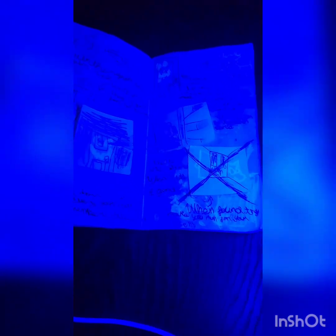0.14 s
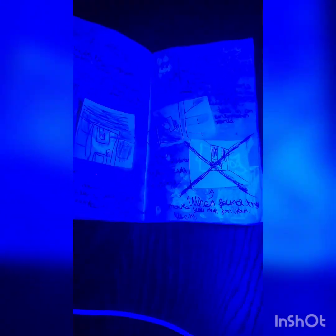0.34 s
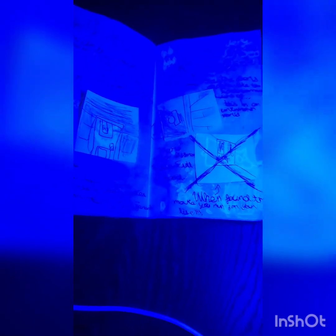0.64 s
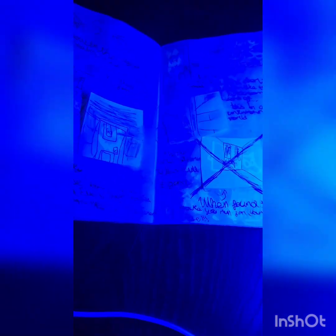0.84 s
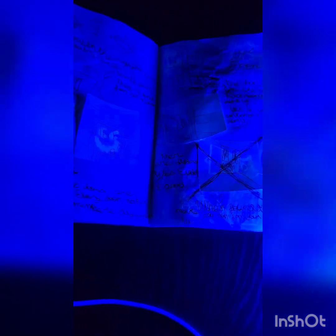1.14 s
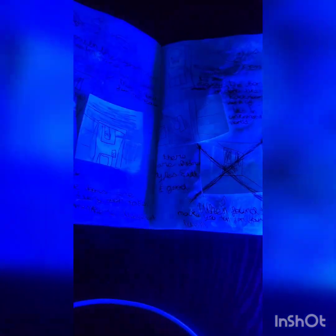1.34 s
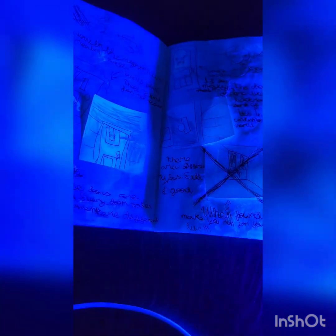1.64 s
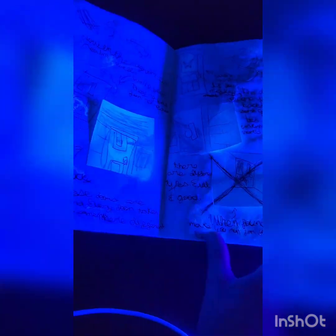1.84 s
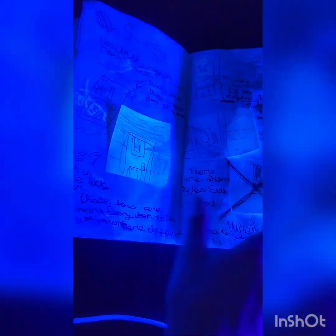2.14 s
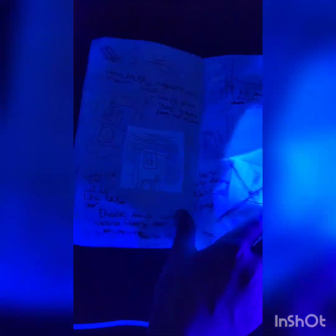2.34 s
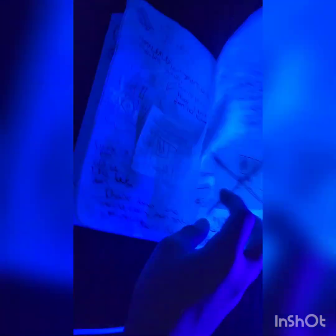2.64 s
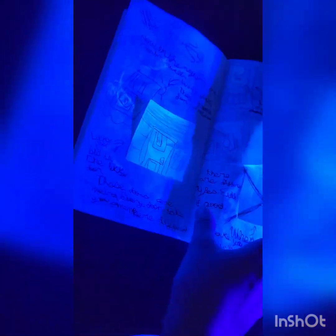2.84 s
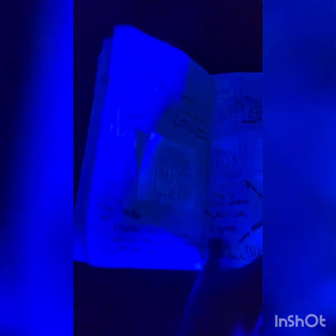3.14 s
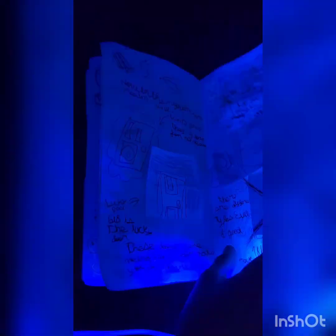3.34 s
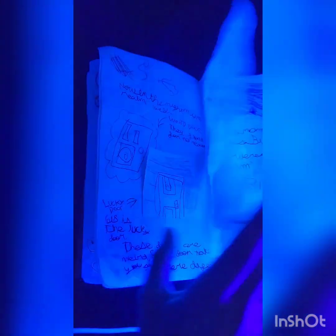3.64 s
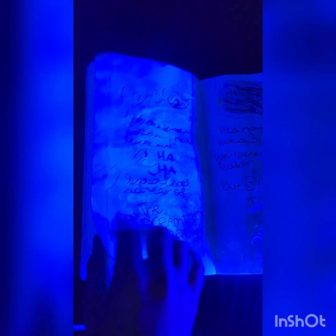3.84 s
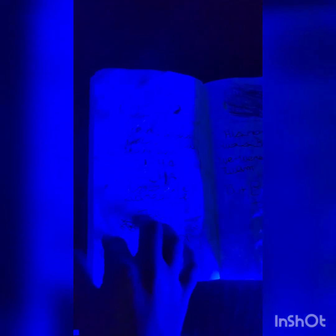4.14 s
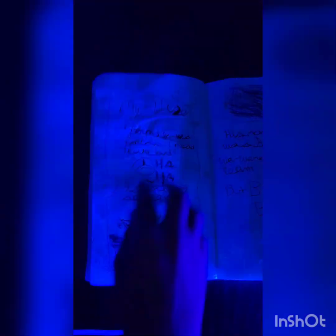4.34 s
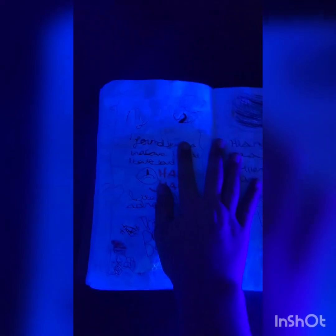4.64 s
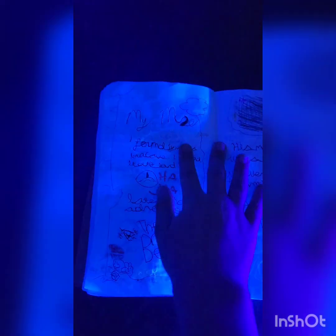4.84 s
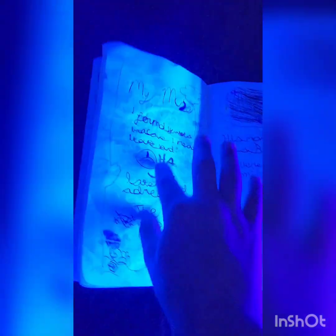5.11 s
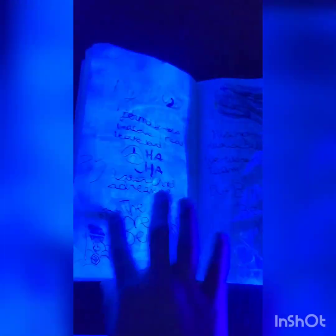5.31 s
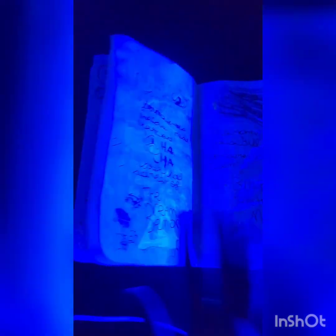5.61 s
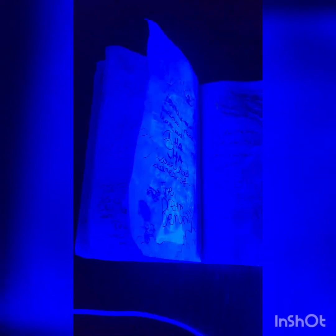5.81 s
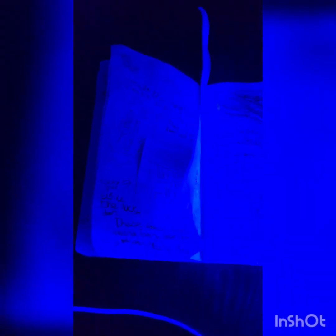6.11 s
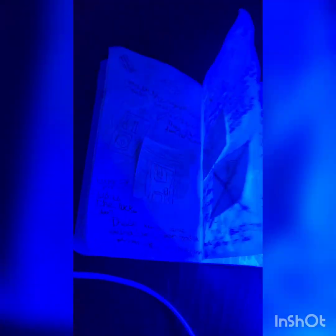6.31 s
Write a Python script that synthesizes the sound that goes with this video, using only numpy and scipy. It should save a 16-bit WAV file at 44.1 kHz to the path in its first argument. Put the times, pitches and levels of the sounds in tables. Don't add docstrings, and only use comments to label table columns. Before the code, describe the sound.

In a quiet indoor room, very close to a stereo phone microphone, a small hard object is knocked down sharply, then rattles loosely. Stiff, thick book pages are lifted and turned with hissing slides, crackling creases and a low thump on the table, ending the turn with a bright, sharp snap. Softer smoothing strokes, small snaps and dull finger pats follow over faint hiss and low building drone.

```python
import sys
import numpy as np
from scipy import signal
from scipy.io import wavfile
from scipy.ndimage import uniform_filter1d

SR = 44100
rng = np.random.default_rng(int(sys.argv[2]) if len(sys.argv) > 2 else 0)


def voltage_ratio(level):
    return 10 ** (np.asarray(level, float) / 20)


def generate_wav(signal):
    frames = np.transpose(np.atleast_2d(signal))
    scaled = np.clip(frames, -1, 1) * 32767
    pcm = np.round(scaled).astype(np.int16)
    wavfile.write(sys.argv[1], SR, pcm)


N = 285327

# pitch_hz [Hz], level_db [dB per Hz]
SLIDE_COLOUR = [(400, -19), (1000, 2.5), (1800, 0.5), (2600, 3), (3500, 3.5), (5400, 3), (7500, 3.5),
                (11000, -1.5), (16000, 6.5)]


def slide():
    dull_level, sharp_level, body_level = strokes()
    quick_clumps = evened(uniform_filter1d(rng.standard_normal(N), size=400))
    slow_clumps = evened(uniform_filter1d(rng.standard_normal(N), size=1600))
    clumps = voltage_ratio(1.0 * quick_clumps + 0.67 * slow_clumps)

    happens = rng.random(N) < 1500 / SR
    tick_size = voltage_ratio(2.8 * np.minimum(rng.exponential(1, N), 5))
    ticks = happens * tick_size * rng.choice([-1, 1], N)
    shared = rng.standard_normal((3, 1, N))
    ports = rng.standard_normal((3, 2, N))
    fine, coarse, page = clumps * (0.46 * evened(ticks) + 0.22 * shared + 2.2 * ports)

    sharp = coloured(coloured(fine, SLIDE_COLOUR), [(2500, -20), (4300, -3), (6000, 0)])
    dull = coloured(coloured(coarse, SLIDE_COLOUR), [(3000, 0), (4300, -3), (7500, -20)])
    hiss = (dull * dull_level + sharp * sharp_level) / (dull + sharp).std()
    body = evened(band(band(page, 610, 1430), 610, 1430))
    rubbing = patchy(hiss + body_level * body)
    return sides(0.49)[:, None] * (rubbing + dull_level * crackle())


# start_s [s], length_s [s],
# rise_share [part of the length], peak_db [dB], bright_db [dB]
PAPER_STROKES = [(0.99, 0.16, 0.86, -67, 6.5), (1.39, 0.23, 0.23, -63.5, -2), (1.919, 0.18, 0.051, -57.5, 0),
                 (1.978, 0.15, 0.73, -55.5, -2.5), (2.118, 0.16, 0.22, -59, -2.5),
                 (2.302, 0.05, 0.043, -46, -1), (2.356, 0.086, 0.06, -48.5, -1.5),
                 (2.391, 0.36, 0.18, -36.5, -0.5), (2.575, 0.14, 0.65, -38.5, -2),
                 (2.687, 0.24, 0.64, -42.5, -1), (2.885, 0.19, 0.31, -55.5, -1.5),
                 (3.041, 0.034, 0.61, -48.5, -5), (3.072, 0.53, 0.31, -39, -1.3),
                 (3.348, 0.11, 0.94, -44, -4.5), (3.433, 0.15, 0.93, -49.5, -2.5),
                 (3.609, 0.14, 0.24, -60, -1.5), (3.792, 0.05, 0.92, -56.5, -9),
                 (3.834, 0.037, 0.54, -31, -0.5), (3.842, 0.19, 0.065, -46.5, -2),
                 (3.943, 0.25, 0.36, -58.5, 2),
                 (4.185, 0.16, 0.53, -49, 2), (4.33, 0.068, 0.43, -51, -1.5), (4.4, 0.1, 0.41, -46.5, 0),
                  (4.494, 0.096, 0.25, -41, 0), (4.55, 0.22, 0.42, -49, -1),
                  (4.629, 0.074, 0.66, -46.5, -2), (4.76, 1, 0.17, -59.5, -2.5),
                  (5.03, 0.19, 0.87, -50.5, -0.5), (5.2, 0.29, 0.17, -56, 7.5),
                  (5.418, 0.14, 0.17, -54.5, 4), (5.481, 1, 0.15, -65.5, -2), (5.68, 0.5, 0.5, -68.5, 3),
                  (6.03, 0.13, 0.86, -56, -2.5), (6.17, 0.065, 0.48, -55.5, -9.5),
                  (6.231, 0.054, 0.38, -61, -10), (6.26, 0.62, 0.14, -59.5, -4.5)]


def strokes():
    edge_db, edge_power = -13.5, 1.31
    t, power = np.arange(N) / SR, np.zeros((3, N))
    for start, length, share, db, bright_db in PAPER_STROKES:
        now = slice(round(start * SR), round((start + length) * SR))
        peak = start + np.clip(share, .02, .98) * length
        swell = np.interp(t[now], [start, peak, start + length], [0, 1, 0])
        body_db = -13 - 0.2769 * (db + 55.5) - 1.64 * bright_db
        part_db = np.array([[-bright_db], [bright_db], [body_db]])
        level = voltage_ratio(db + edge_db * (1 - swell) ** edge_power + part_db)
        power[:, now] += level ** 2 * np.minimum(swell / 0.3, 1)
    return np.sqrt(power)


def patchy(x):
    z = signal.stft(x, nperseg=256, noverlap=192)[2]
    field = rng.standard_normal(z.shape[1:])
    for axis, size in ((0, 4), (1, 14)):
        field = uniform_filter1d(field, size=size, axis=axis)
        field = uniform_filter1d(field, size=size, axis=axis)
    patches = voltage_ratio(1.37 * evened(field))
    return signal.istft(z * patches, nperseg=256, noverlap=192)[1][:, :N]


def crackle():
    per_s, level_db = 350, -19.5
    out, t = np.zeros(N), np.arange(300) / SR
    size = (rng.random(N) < per_s / SR) * voltage_ratio(4.0 * np.minimum(rng.exponential(1, N), 3))
    pitches = np.geomspace(750, 7500, num=12)
    which = rng.integers(0, len(pitches), N)
    for k, hz in enumerate(pitches):
        fade = voltage_ratio(-60 * t * hz / 9.4) * (1 - np.exp(-t * hz / 0.23))
        grain = np.sin(2 * np.pi * hz * t) * fade
        out += signal.oaconvolve(size * (which == k), grain * np.sqrt(hz / 1000))[:N]
    return voltage_ratio(level_db) * evened(out)


# [dB, plus is left]
HAND = [(1.9, 3.5), (2.7, 14), (3.1, 3), (3.3, 2), (3.8, 12), (4.6, 2), (5.2, 7), (5.9, 11), (6.47, 14)]
# multiple [of its main pitch], level_db [dB]
PAGE_MODES = [(1, -0.5), (.55, -12.5), (1.7, -9.5), (2.4, -14.5), (3.4, -21)]
# start_s [s], peak_db [dB], pitch_hz
# [Hz], crack_db [dB over the ring]
CREASE_SNAPS = [(1.927, -50, 996, 14), (2.017, -34, 4200, -9), (2.3035, -33, 1144, 9), (2.36, -30, 2630, 17),
                (2.372, -37.5, 845, -11), (2.388, -36, 990, 3), (2.4194, -24, 930, 5), (2.438, -19, 940, 5.5),
                (2.448, -28, 2430, -6), (2.487, -26.5, 850, -22), (2.502, -35, 1500, -18),
                (2.519, -31, 1570, -9), (2.551, -28.5, 2800, 3), (2.602, -29, 1010, -20),
                (2.648, -22.5, 1220, -4), (2.672, -22, 1390, 4.5), (2.702, -34.5, 970, -23),
                (3.049, -32.5, 1720, 23), (3.059, -22.5, 2160, 0), (3.098, -28.5, 1390, -16),
              (3.175, -32, 1100, -10), (3.188, -33, 1280, -12), (3.207, -26.5, 2490, -16),
              (3.226, -24, 990, -4), (3.256, -23.5, 1650, -15), (3.287, -18.5, 1430, 7),
              (3.304, -49, 1090, -20), (3.4212, -29, 1450, -3), (3.442, -19.5, 3300, -24),
              (3.451, -30, 1120, -3), (3.549, -43.5, 1030, -12), (3.742, -43, 2140, -25),
              (3.814, -34.5, 1056, -32.5), (3.839, -26.5, 1770, -4), (3.8485, -13.5, 6960, 1.5),
              (3.86, -28, 1080, -1), (3.909, -32.5, 2000, -4), (3.986, -41, 2010, -21),
              (3.9994, -33.5, 890, -29), (4.014, -39, 6500, -8), (4.039, -50, 5950, 2.5),
                (4.196, -48, 930, 0), (4.237, -45, 920, -10), (4.358, -37, 8000, -10),
                (4.648, -38, 1030, -7), (4.776, -44, 1030, -18.5), (4.894, -45.5, 1084, 14),
                (5.044, -46, 1080, -16), (5.347, -41, 6030, -18), (5.462, -46.5, 2300, -0.5),
                (6.134, -43, 3300, -11), (6.254, -50, 740, -22), (6.39, -56, 2900, -10),
                (4.265, -30, 1120, -7), (4.275, -28.5, 5530, -21), (4.293, -38, 910, 6),
                (4.361, -34.5, 845, -19), (4.393, -43, 1260, -16), (4.553, -19.5, 823, 2.5),
                (4.754, -25, 1480, 27), (4.857, -43, 960, -25), (4.942, -47, 1150, -21),
                (4.992, -37.5, 1190, 6), (5.052, -38.5, 7640, 3), (5.073, -36.5, 1030, 8),
                (5.12, -43, 915, -22), (5.173, -35, 890, -6), (5.192, -47, 950, -16),
                (5.451, -40, 2120, -2), (5.692, -35, 1070, -17), (5.722, -45, 775, -24),
                (5.927, -36.5, 3760, -8), (6.043, -39.5, 2150, -13), (6.128, -41.5, 1580, 20),
                (6.15, -35.5, 1250, -30), (6.198, -41, 2190, 2), (6.211, -41.5, 640, -19),
                (6.248, -33.5, 670, -28), (6.347, -44, 2070, 12)]


def snaps():
    pitch_scatter, scatter_db, page_q = 0.19, 5, 1.7
    out, t = np.zeros((2, N)), np.arange(1200) / SR
    for s, db, hz, crack_db in CREASE_SNAPS:
        pan_db = np.interp(s, *np.transpose(HAND))
        grit = grit_pair(t, 0.0024, 0.00018, alike=0.72)
        flick, ring = grit + 3.4 * (t == 0), 0
        chances = rng.standard_normal((len(PAGE_MODES), 2))
        for (multiple, mode_db), (a, b) in zip(PAGE_MODES, chances):
            mode_hz = min(hz * multiple ** (1 + pitch_scatter * a), 15000)
            width_hz = mode_hz / page_q
            mode = resonate(resonate(flick, mode_hz, width_hz), mode_hz, width_hz)
            level = voltage_ratio(mode_db + scatter_db * b * (multiple != 1))
            ring = ring + level * mode / abs(mode).max()
        ring = band(ring, max(0.37 * hz, 600), 2.66 * hz)
        crack = band(grit, 894, 6400) + 0.35 * band(grit, 4600, 11400)
        crack = crack + 0.46 * np.sqrt(hz / 1500) * band(grit, 11050, 16300)
        snap = ring / abs(ring).max() + voltage_ratio(crack_db) * crack / abs(crack).max()
        add(out, s + 0.00055, voltage_ratio(db - 3.0) * snap / abs(snap).max(), 0.5 * pan_db)
    return out


# start_s [s], end_s
# [s], pitch_hz [Hz], width_hz [Hz], level_db [dB]
NOISE_BANDS = [(0, 0.039, 2320, 3020, -69), (2.444, 2.698, 7740, 900, -57), (2.141, 2.187, 7450, 896, -69),
               (4.221, 4.3, 6600, 2500, -62), (4.648, 4.714, 7980, 1190, -63), (5.25, 5.322, 7300, 690, -64),
               (5.265, 5.288, 2600, 600, -64), (6.038, 6.118, 2100, 302, -73), (1.415, 1.57, 2580, 3750, -57.5),
               (2.735, 2.915, 3470, 900, -60), (3.364, 3.46, 3780, 1200, -58), (5.023, 5.207, 3590, 404, -63),
               (5.224, 5.41, 5750, 1210, -78), (5.724, 5.91, 1030, 69, -64), (6.262, 6.462, 3300, 1500, -67.5)]


def noise_bands():
    out = np.zeros((2, N))
    for start, end, hz, width_hz, db in NOISE_BANDS:
        noise = rng.standard_normal((2, round((end - start) * SR)))
        tone = evened(resonate(resonate(noise, hz, width_hz), hz, width_hz))
        add(out, start, voltage_ratio(db) * tone * signal.windows.tukey(noise.shape[1], .5), 3)
    return out


# [s, of which a fall of 60 dB takes
SHELL = [(2250, -5, 0.044), (2630, -6, 0.035), (3300, -8, 0.0097), (4390, -0.5, 0.0084), (5400, -6, 0.0084),
         (6250, -8, .015), (7590, -6.5, 0.01), (11800, -9, 0.006), (14600, -11, 0.005)]
# start_s [s], peak_db [dB], thud_hz [Hz], ring_db [dB over the thud], favoured_hz [Hz]
SET_DOWN = [(1.119, -47, 440, 3, 14600), (1.142, -41, 400, 5, 11800), (1.158, -39, 410, 5.5, 14600),
            (1.192, -33, 550, 2, 11800), (1.2333, -9.5, 727, -11.5, 2867), (1.2342, -2, 1470, -2, 2850),
            (1.2357, -10, 1320, 3, 7700), (1.236, -8, 1420, 5.5, 5970), (1.2402, -13.5, 1400, 4.5, 7590),
            (1.2495, -21, 640, -4.5, 2600), (1.266, -25.5, 605, -17.5, 2634),
            (1.281, -13.5, 736, -4.5, 3300), (1.2994, -16.5, 664, -4, 2300),
            (1.312, -21.5, 620, -2.5, 2240), (1.285, -22, 590, 1.5, 2280), (1.361, -30, 563, -3.5, 6200),
            (1.374, -29, 535, -1, 4330)]
RATTLE = [(1.5336, -7.5, 770, -5, 2250), (1.536, -6, 1510, -4, 2260), (1.5419, -9.5, 1360, -4, 4400),
          (1.569, -17, 410, -1, 7500), (1.5722, -17, 433, 2, 2630), (1.5788, -18.5, 725, 6, 4390),
          (1.585, -22.5, 800, 3.5, 4390), (1.59, -39, 700, 4, 2630), (1.636, -23.5, 402, 3.5, 3800),
          (1.6432, -20, 1266, 2.5, 3400), (1.6713, -16, 462, -5, 5300), (1.6747, -17, 543, -1.5, 6200),
          (1.6858, -12.5, 533, -1.5, 2130), (1.689, -24.5, 560, -2, 2220), (1.6945, -19, 615, 0, 4390),
          (1.6975, -20.5, 546, -4, 2230), (1.7002, -17.5, 533, -1, 2250), (1.703, -16, 517, -1.5, 4430),
          (1.7068, -32, 520, -1.5, 2180)]
# start_s [s], peak_db [dB], thud_hz [Hz]
PATS = [
    (1.8863, -37, 179),
    (6.009, -46.5, 550),
    (6.04, -39.5, 394),
    (6.093, -45.5, 505),
    (6.151, -41, 756),
    (6.211, -41.5, 475),
    (6.254, -37, 700),
]


def knocks():
    out, t = np.zeros((2, N)), np.arange(2500) / SR
    late = np.maximum(t - np.array([[.00016], [0]]), 0)
    pats = [(*pat, -16.5, 2250) for pat in PATS]
    for s, db, thud_hz, ring_db, favoured_hz in SET_DOWN + RATTLE + pats:
        pan_db = 1.5 + 6 * rng.standard_normal()
        thud = np.sin(2 * np.pi * thud_hz * late) * voltage_ratio(-60 * late * thud_hz / 8.6)
        thud = thud * (1 - np.exp(-late / 0.0006))
        grit = grit_pair(t, 0.0028, 0.00035, alike=0.15)
        crack = .2 if 1.56 < s < 1.72 else 1.5
        ring = band(grit, 550, 8800) + 1.1 * band(grit, 6400, 18200)
        ring = crack * ring / abs(ring).max()
        for hz, mode_db, fade_s in SHELL:
            lean_db = mode_db - 8.9 * abs(np.log2(hz / favoured_hz))
            bent_hz = hz * (1 + 0.008 * rng.standard_normal())
            mode = resonate(grit, bent_hz, 4.0 / fade_s)
            ring = ring + voltage_ratio(lean_db) * mode / abs(mode).max()
        ring *= voltage_ratio(ring_db) / abs(ring).max()
        add(out, s, voltage_ratio(db + 0.5) * ring, pan_db)
        thud_share = max(1 - voltage_ratio(1.39 * ring_db), .05)
        thud = voltage_ratio(db + 0.5) * thud_share * thud / abs(thud).max()
        add(out, s, thud, 0.28 * pan_db)
    return out


def grit_pair(t, fall_s, rise_s, alike):
    shared, *own = rng.standard_normal((3, len(t)))
    alike = np.clip(alike, 0, 1)
    noise = alike * shared + np.sqrt(1 - alike ** 2) * np.array(own)
    return noise * np.exp(-t / fall_s) * (1 - np.exp(-t / rise_s))


# pitch_hz [Hz], likeness [-1 to 1]
SAME = [(60, 0.83), (180, 0.97), (550, 0.81), (1650, -0.13), (4970, 0.02), (15000, -0.22)]
# pitch_hz [Hz], fade_s [s to fall 60 dB]
TAIL = [(300, 0.34), (1000, 0.39), (4000, 0.32), (12000, 0.3)]
# delay_s [s], level_db [dB]
WALLS = [
    (.0019, -15.5),
    (.0043, -19),
    (.0076, -13),
    (.013, -14),
]


def room(x):
    taps = np.zeros((3, 2, SR // 2))
    shift = rng.integers(0, 10, (3, 2, (SR // 2 - 501) // 10))
    at = np.arange(500, SR // 2 - 10, 10) + shift
    np.put_along_axis(taps, at, rng.choice([-1., 1.], at.shape), 2)
    hz, t, z = signal.stft(taps, SR, nperseg=256)
    same = np.clip(read(SAME, hz), 0, 1)[:, None]
    right = same * z[:, 0] + np.sqrt(1 - same ** 2) * z[:, 1]
    z = np.stack([z[:, 0], right], axis=1)
    fade = voltage_ratio(-60 * t / read(TAIL, hz)[:, None])
    tails = signal.istft(z * fade, SR, nperseg=256)[1]
    tails *= voltage_ratio(-9.0) / np.linalg.norm(tails[0, 0])

    phase = 130 * np.arange(N) / SR + np.arange(3)[:, None, None] / 3
    turns = np.sqrt(2 / 3) * np.cos(2 * np.pi * phase)
    out = signal.fftconvolve(turns * x[:1], tails, axes=2).sum(0)[:, :N]
    for s, db in WALLS:
        for side, late in enumerate((round(s * SR), round(1.1 * s * SR))):
            out[side, late:] += voltage_ratio(db) * x[0, :-late]
    return out


# time_s [s], level_db [dB]
DRONE = [(0, -37), (.1, -49), (.33, -57), (.62, -48.5), (1.05, -56.5), (1.6, -60.5), (2.4, -57),
         (2.49, -41), (3.17, -60.5), (4.7, -56), (4.82, -44.5), (5.02, -66), (5.14, -44.5), (5.28, -57),
         (6.47, -55.5)]
# time_s [s], level_db [dB], fall_db_per_s [dB per s]
THUMPS = [
    (1.63, -55, 67),
    (2.468, -36.5, 83),
    (2.75, -64.5, 5.5),
    (4.3, -64, 45),
]


def rumble():
    t, noise = np.arange(N) / SR, rng.standard_normal((4, N))
    swell = voltage_ratio(np.interp(t, *np.transpose(DRONE)))
    shake = voltage_ratio(-58)
    for s, db, fall_db in THUMPS:
        rise = np.clip(1 + (t - s) / 0.045, 0, 1)
        shake = shake + voltage_ratio(db - fall_db * np.maximum(t - s, 0)) * rise
    drone = [swell * evened(resonate(resonate(n, 49, 19.0), 49, 19.0)) for n in noise[:2]]
    boom = [shake * evened(band(band(resonate(n, 89.2, 57), 37, 188), 38.6, 380)) for n in noise[2:]]
    shared = sides(3.7)[:, None] * (drone[0] + boom[0])
    return shared + .06 * np.outer([1, -1], drone[1] + boom[1])


# pitch_hz [Hz], level_db [dB per Hz] # (the overall level is set
ROOM_TONE = [(100, -7.5), (150, -9.5), (200, -10.5), (240, -23), (350, -11.5), (560, -13), (760, -31),
             (1030, -22.5), (1300, -34.5), (2000, -36.5), (4000, -38.5), (7500, -36.5), (12000, -46),
             (16000, -29)]
# pitch_hz [Hz], width_hz [Hz], lift_db [dB]
HUMS = [(203, 6, 6.5), (340.3, 19, 10.5), (425, 7.9, 2), (522.3, 5.7, 6), (600, 8.9, 4.5), (1030, 20, 10.5),
        (1390, 47, 12), (2300, 60, 8.5), (5030, 90, 6), (7940, 500, 8.5)]


def room_tone():
    frames, hz = N // 512 + 5, np.fft.rfftfreq(2048, 1 / SR)
    a, b, c, d, patches = rng.standard_normal((frames, 1025, 5)).T
    patches = uniform_filter1d(patches, size=20, axis=0)
    patches = evened(uniform_filter1d(patches, size=8, axis=1))
    humps_db = sum(db / (1 + ((hz - f) / width) ** 2) for f, width, db in HUMS)
    same = np.clip(read(SAME, hz), -1, 1)[:, None]
    left = a + 1j * b
    right = same * left + np.sqrt(1 - same ** 2) * (c + 1j * d)
    z = np.array([left, right])
    z *= voltage_ratio((read(ROOM_TONE, hz) + humps_db)[:, None] + 2.0 * patches)
    tone = evened(signal.istft(z, nperseg=2048, noverlap=1536)[1][:, :N])
    no_bass = signal.butter(2, 110, "high", fs=SR, output="sos")
    return voltage_ratio(-57.5) * signal.sosfilt(no_bass, tone)


def evened(x):
    return x / np.sqrt(np.mean(x ** 2) + 1e-20)


def read(points, hz):
    f, value = np.transpose(points)
    return np.interp(np.log(hz + 1), np.log(f + 1), value)


def sides(db):
    return voltage_ratio(np.array([.5 * db, -.5 * db]))


def resonate(x, hz, width_hz):
    turn = np.exp(2j * np.pi * hz * np.arange(x.shape[-1]) / SR)
    r = np.exp(-np.pi * abs(width_hz) / SR)
    return 2 * (turn * signal.lfilter([1 - r], [1, -r], x / turn)).real


def band(x, lo_hz, hi_hz):
    limits = [lo_hz, min(hi_hz, SR / 2 - 10)]
    return signal.sosfilt(signal.butter(2, limits, "band", fs=SR, output="sos"), x)


def coloured(x, points):
    log_gain = read(points, abs(np.fft.fftfreq(4096, 1 / SR))) * np.log(10) / 20
    taps = np.fft.ifft(np.exp(np.conj(signal.hilbert(log_gain)))).real[:2048]
    return signal.oaconvolve(x, taps[None], axes=1)[:, :N]


def add(mix, s, sound, pan_db):
    part = mix[:, round(s * SR):][:, :sound.shape[1]]
    part += sides(pan_db)[:, None] * sound[:, :part.shape[1]]


def scene():
    contacts, creases = knocks(), snaps()
    paper = creases + slide() + noise_bands()
    echoes = room(voltage_ratio(-1.5) * contacts + voltage_ratio(-3.0) * creases)
    return contacts + paper + echoes + room_tone() + rumble()


def low_pass(x):
    return signal.sosfilt(signal.butter(12, 16480, fs=SR, output="sos"), x)


# pitch_hz [Hz], level_db [dB]
MICROPHONE = [(6000, 1.26), (7700, 4.5), (8500, 0), (9200, -8.5), (10000, -7), (11200, 0), (15650, -6),
              (15850, -53), (17000, -62)]
# pitch_hz [Hz], left_right_db [dB]
PORTS = [(60, 0), (180, 0.5), (550, 6), (1650, 5.5), (4970, 8.5), (15000, 4.5)]


def record(dry):
    no_bass = signal.butter(4, 36, "high", fs=SR, output="sos")
    left, right = coloured(signal.sosfilt(no_bass, dry), MICROPHONE)
    left = coloured(left[None], [(hz, .5 * db - 1.42) for hz, db in PORTS])[0]
    right = coloured(right[None], [(hz, 1.25 - .5 * db) for hz, db in PORTS])[0]
    return low_pass(np.clip([left, right], -1, 1))


dry = scene()
out = record(dry)
generate_wav(out)
```